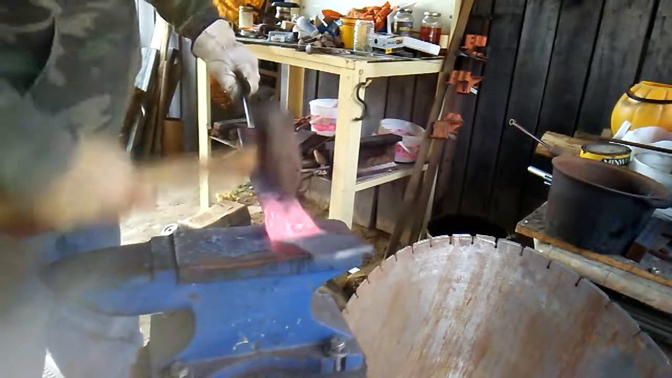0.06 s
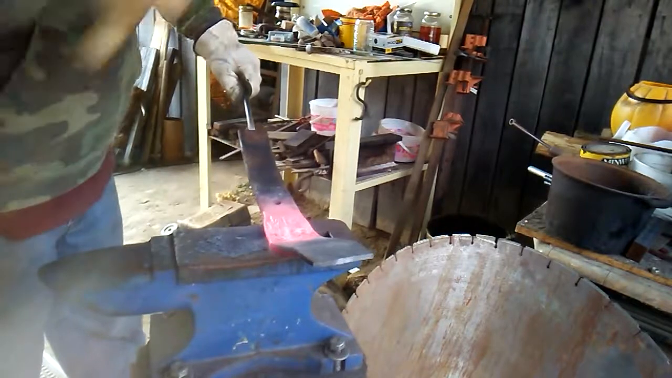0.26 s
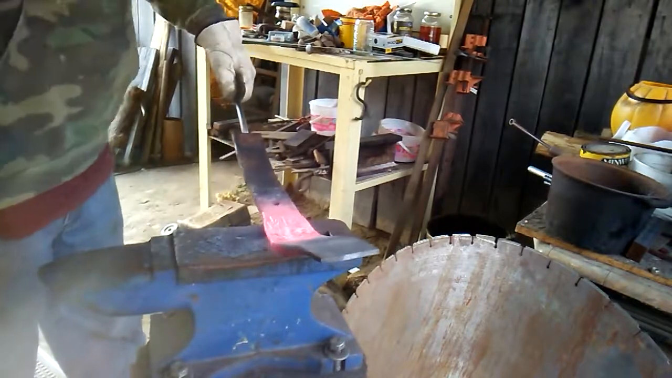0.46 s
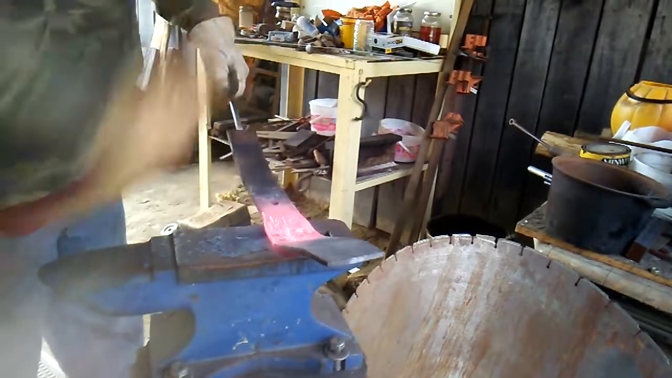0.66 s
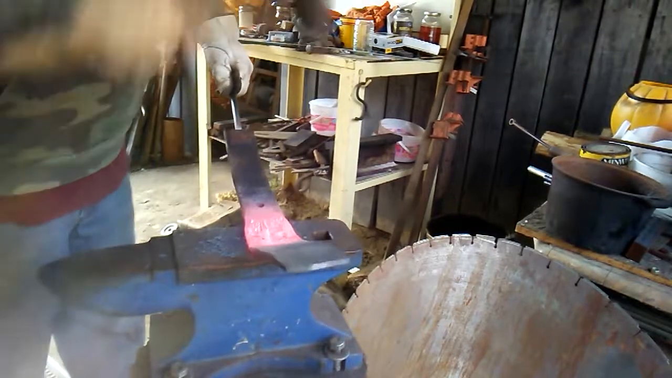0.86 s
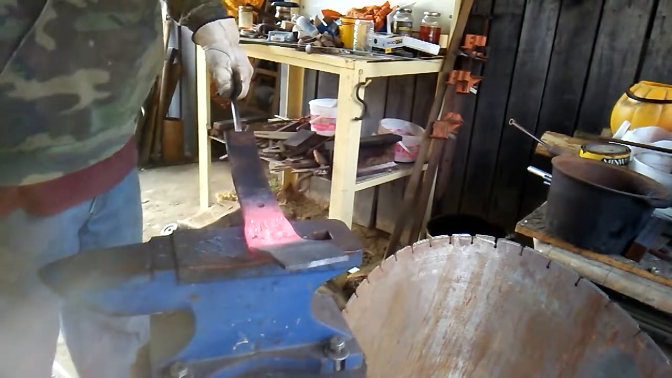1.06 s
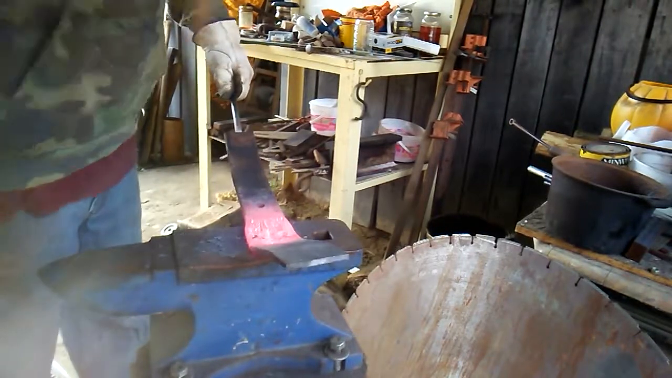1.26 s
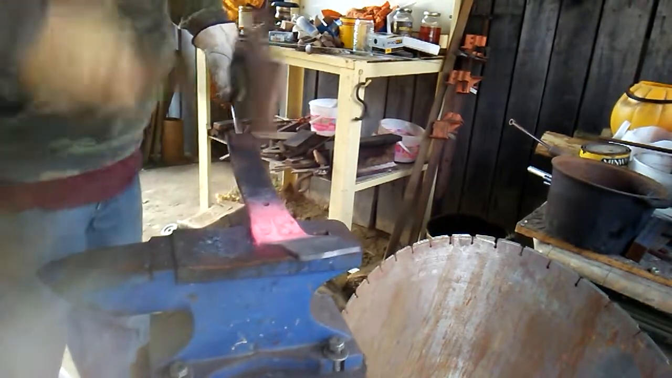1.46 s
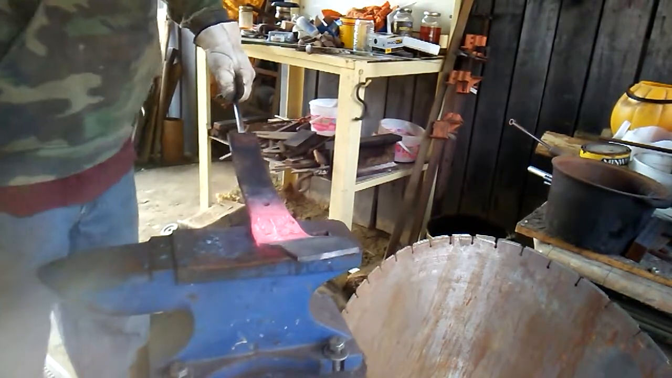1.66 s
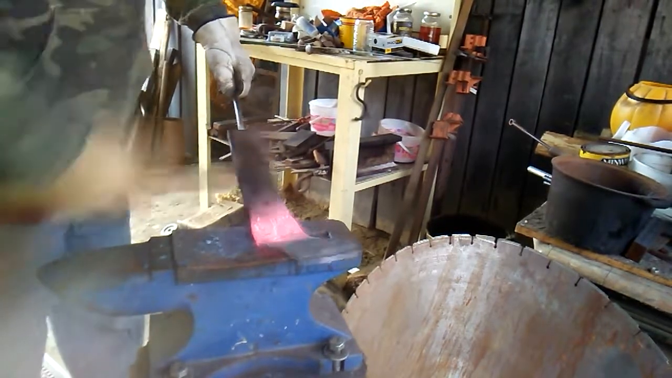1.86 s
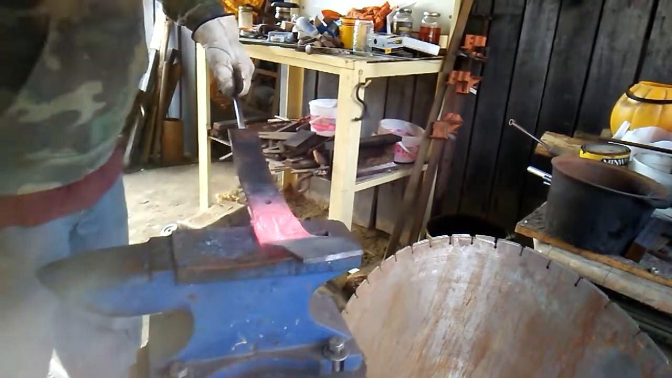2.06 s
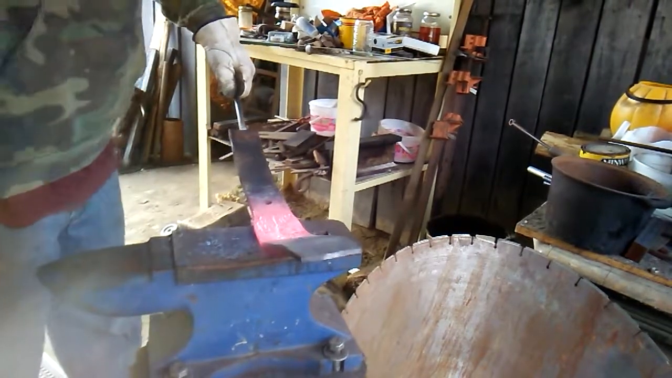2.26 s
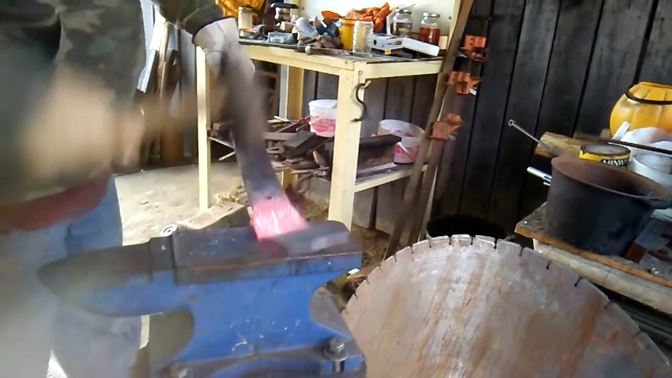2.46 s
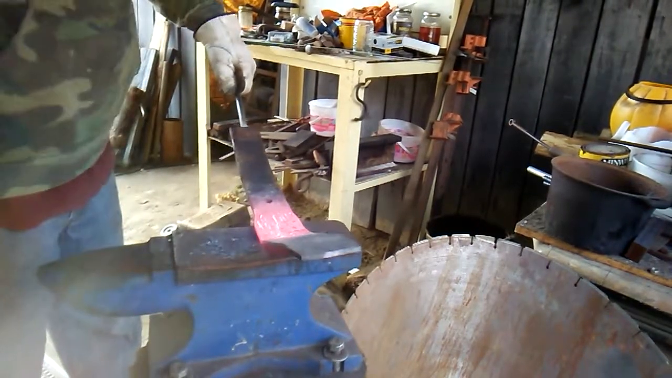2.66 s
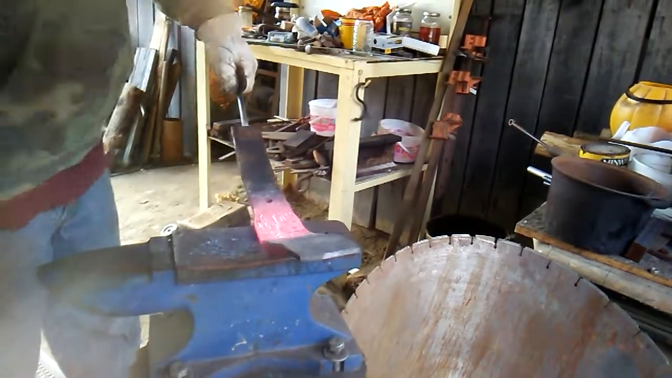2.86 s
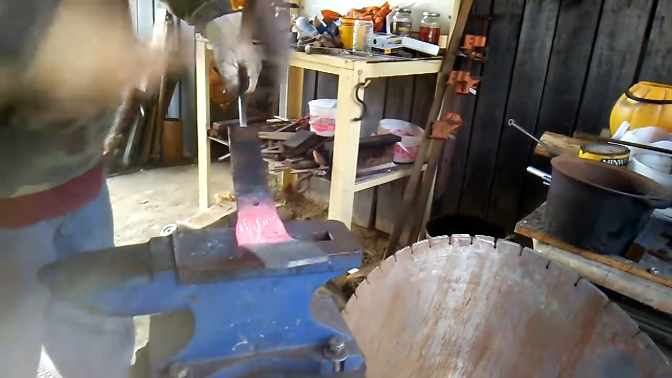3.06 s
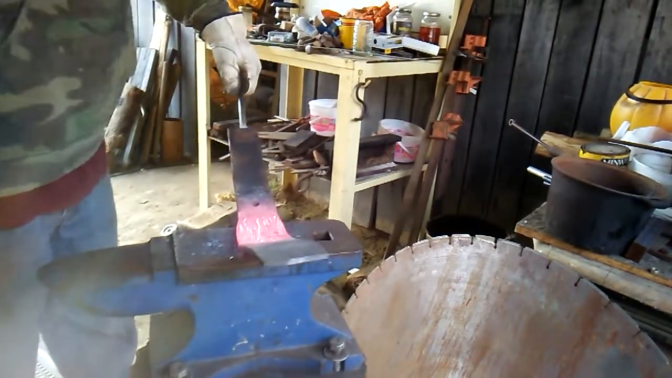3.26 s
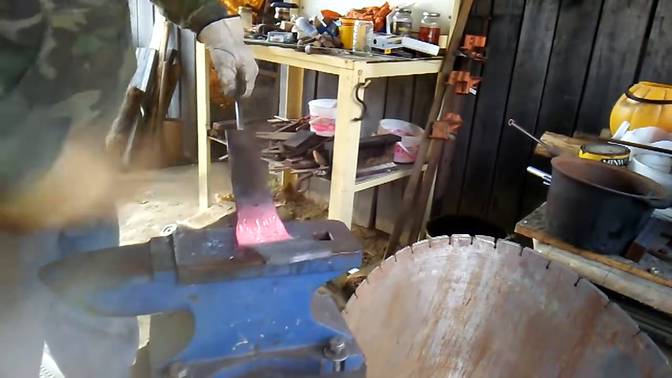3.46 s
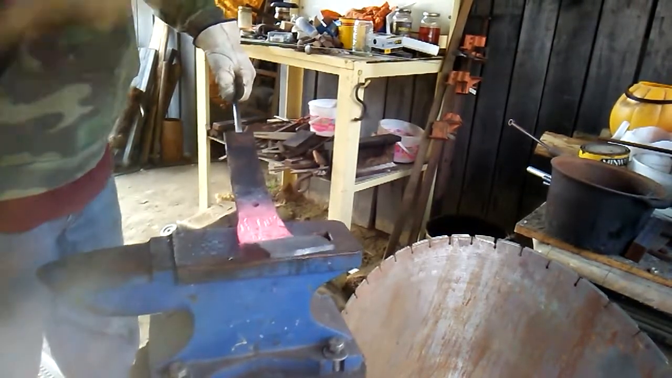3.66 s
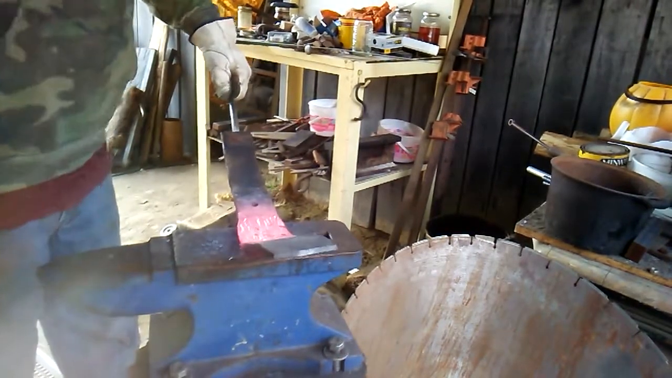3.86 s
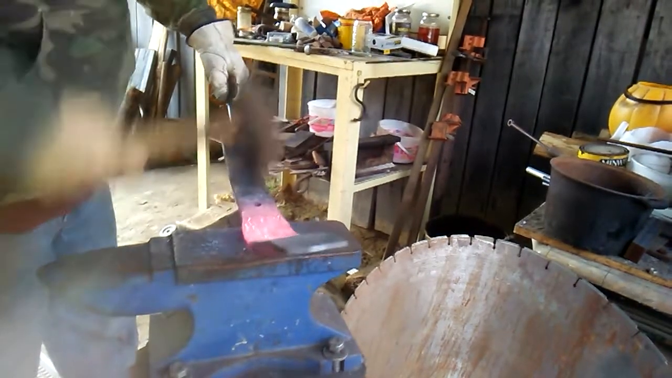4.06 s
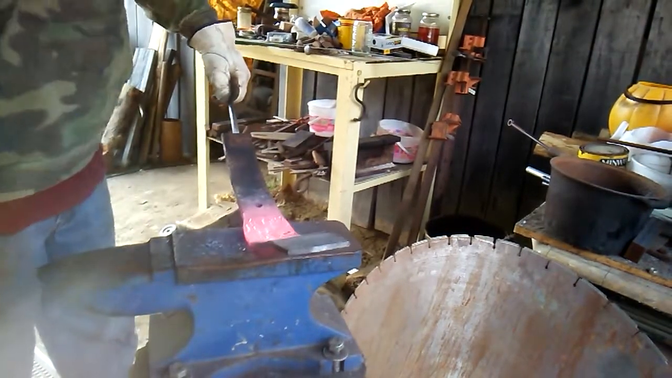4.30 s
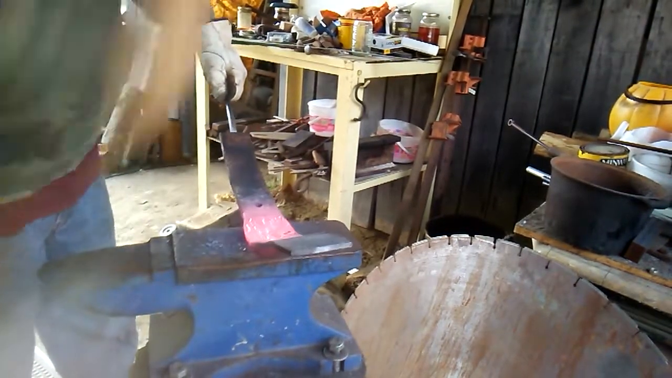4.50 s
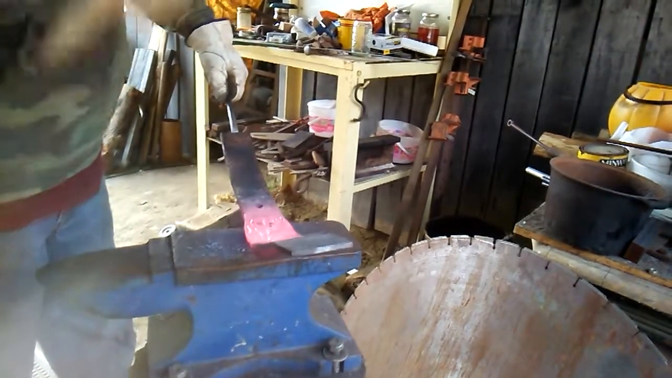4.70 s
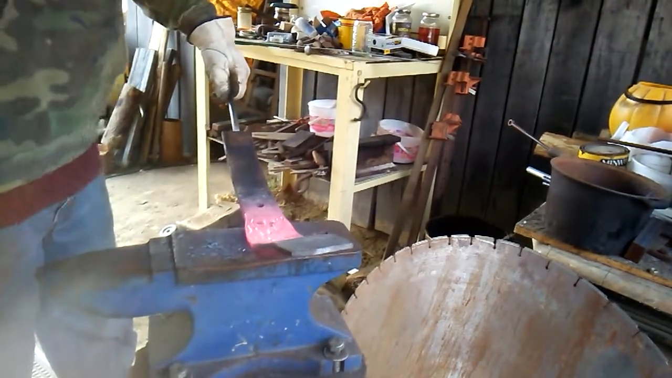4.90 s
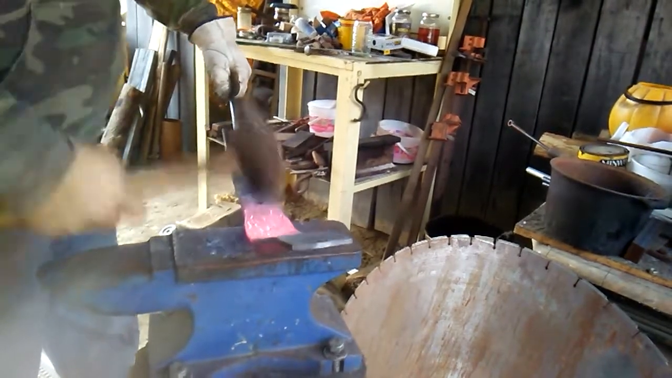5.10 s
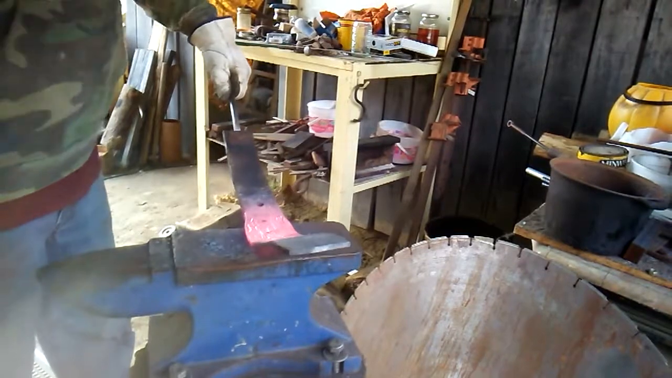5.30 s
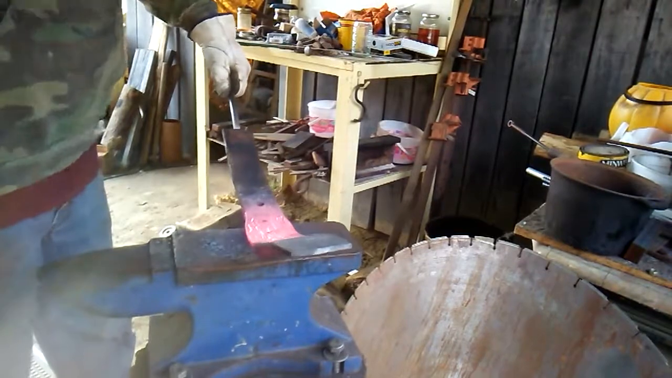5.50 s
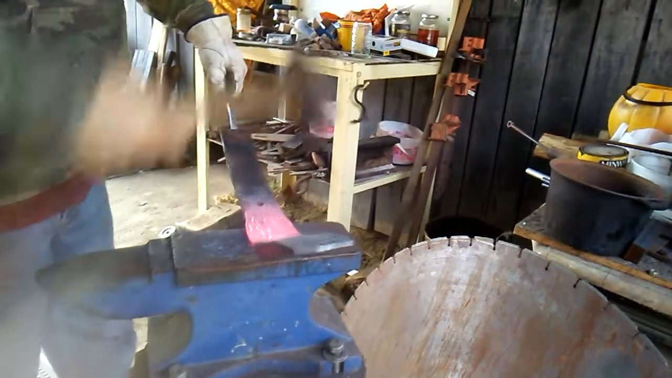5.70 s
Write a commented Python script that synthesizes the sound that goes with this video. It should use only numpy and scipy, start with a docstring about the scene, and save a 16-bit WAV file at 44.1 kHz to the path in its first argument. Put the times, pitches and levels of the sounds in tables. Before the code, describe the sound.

Steady, sharp hammer blows clang on a steel bar and anvil in a small workshop while a motor hums softly.

```python
"""A smith flattens a red-hot steel bar on an anvil in a small wooden shop.
From the start a motor, likely the forge blower, hums in a slow, even throb over a soft hiss.
Ten hammer blows follow, each a crack, a crash with short clanging modes, then a thin high ring;
they overload the microphone. The bar slides before the second blow and bounces after it,
then slides again before the third and eighth. From the third on, the beat is even."""
import sys
import numpy as np
from scipy import signal
from scipy.fft import rfft, irfft
from scipy.io import wavfile
from scipy.ndimage import uniform_filter1d

SR = 44100
rng = np.random.default_rng(int(sys.argv[2]) if len(sys.argv) > 2 else 0)


def waveform_to_disk(signal):
    """Save audio, clipped to [-1, 1], as 16-bit WAV at the path in sys.argv[1]."""
    frames = np.transpose(np.atleast_2d(signal))
    scaled = np.clip(frames, -1, 1) * 32767
    samples = np.round(scaled).astype(np.int16)
    wavfile.write(sys.argv[1], SR, samples)


N = 253134

# start_s, force_db, thud_db, bright_db, clang_hz, clang_db, ring_db, ring_t60_s, ping_db
BLOWS = [(0.149, -2.5, 3, -1.5, 5543, -10, 8, 0.35, 0.5),
         (0.8250, -3.5, 2.5, 1.5, 1843, -12, -1.5, 0.42, -8),
         (1.4655, 1.5, -1.5, 5.5, 6750, -5, -4, 0.34, 3), (1.9949, 2, -0.5, 1, 3568, -13, -0.5, 0.22, -2),
         (2.5155, 3.5, -2, -4, 4530, -13, -5, 0.33, 9), (3.0621, 1.5, 0, -2, 2471, -17.5, 6, 0.3, -1),
         (3.5969, 3.5, -4.5, -5, 4340, -18, 1.5, 0.26, -1), (4.1330, 4, -4, 2, 7080, -7, -4.5, 0.44, 3),
         (4.6710, 4.5, -3, 1, 4526, -14, -8.5, 0.32, -0.5),
         (5.1972, 4.5, -3, 3.5, 6420, -22.5, -2.5, 0.26, 0)]


def hammer(t, walls, gain_db=11, crack_db=-4, crack_decay_s=0.0073, ping_hz=8800):
    """Steel strikes steel: a contact crack, a crash and ringing modes."""
    out = np.zeros(N)
    for start_s, force_db, thud_db, bright_db, clang_hz, clang_db, ring_db, ring_t60_s, ping_db in BLOWS:
        blow = amp(crack_db) * np.exp(-t / crack_decay_s) * rng.standard_normal(len(t))
        blow += crash(unit(walls + rng.standard_normal(len(t))), thud_db, bright_db)
        blow += clang(t, thud_db, bright_db, clang_hz, clang_db)
        blow += anvil_ring(t)
        blow += high_ring(t, ring_db, ring_t60_s)
        ping = ring([(ping_hz, ping_db - 32)], t, t60_s=0.35, scatter=1.0, scatter_hz=30.2)
        add(out, start_s, amp(gain_db + force_db) * (blow + ping))
    return out


# freq_hz, density_db
CRASH_SPECTRUM = [(30, -21), (120, -20), (190, -8), (300, -0.5), (450, -8.5), (900, -2.5), (1620, -3.5),
                  (2450, -0.5), (3000, -4), (4300, 1.5), (4950, -2.5), (7000, 1), (9200, -3.5),
                  (12000, -18), (16000, -45)]
# freq_hz, t60_s
CRASH_DECAY = [(100, 0.24), (400, 0.25), (1500, 0.18), (4000, 0.19), (8000, 0.17), (14000, 0.15)]
# freq_hz, relative_db
SHOP_ECHO = [(200, -28), (1500, -27), (3600, -28.5), (4900, -48.5), (7500, -35), (14000, -44.5)]


def crash(noise, thud_db, bright_db, echo_t60_s=0.63):
    """Countless short modes and wall reflections merge into noise that dies band by band."""
    hz, time_s, bands = signal.stft(noise, SR, nperseg=512, noverlap=384)
    hz = hz[:, None]
    # each landing spot favours other modes
    spot_db = 1.8 * unit(uniform_filter1d(rng.standard_normal(hz.shape), 2, axis=0))
    colour = unit(amp(curve(CRASH_SPECTRUM, hz))) * amp(tilt_db(hz, thud_db, bright_db) + spot_db)
    early = amp(-60 * time_s / curve(CRASH_DECAY, hz))
    echo = amp(curve(SHOP_ECHO, hz) - 60 * time_s / echo_t60_s)
    shaped = bands * colour * np.hypot(early, echo)
    return signal.istft(shaped, SR, nperseg=512, noverlap=384)[1][:len(noise)]


# pitch_hz, level_db
STEEL_MODES = [(298, -20), (322, -22), (596, -22), (634, -22), (800, -24), (896, -22), (1000, -22.5),
               (1407, -23), (1843, -15), (1915, -18), (1968, -16), (2461, -19), (2545, -23), (2860, -24),
               (3255, -23), (3568, -17.5), (3780, -20), (4310, -20), (4440, -20), (4526, -17), (5543, -18),
               (5617, -21), (6514, -19), (6748, -17), (6962, -19), (7086, -20)]
# freq_hz, t60_s
STEEL_DECAY = [(300, 0.25), (900, .2), (1900, 0.22), (3600, 0.2), (4600, 0.16), (7000, 0.14)]


def clang(t, thud_db, bright_db, clang_hz, clang_db, modes_gain_db=-3.5, clang_gain_db=2):
    """Modes of hammer, bar and anvil; the landing spot makes one stand out."""
    mode_hz, mode_db = np.transpose(STEEL_MODES)
    struck_db = mode_db + modes_gain_db + tilt_db(mode_hz, thud_db, bright_db)
    struck_db[np.argmin(abs(mode_hz - clang_hz))] = clang_gain_db + clang_db
    modes = list(zip(mode_hz, struck_db))
    return ring(modes, t, curve(STEEL_DECAY, mode_hz), scatter=1.1, scatter_hz=25)


# pitch_hz, level_db
HIGH_MODES = [(10675, -30), (10866, -18), (10968, -14), (12790, -42)]


def high_ring(t, ring_db, t60_s, gain_db=-11.5):
    """Thin, long-ringing modes of the steel."""
    return amp(gain_db + ring_db) * ring(HIGH_MODES, t, t60_s, scatter=0.6, scatter_hz=24)


# pitch_hz, level_db
ANVIL_MODES = [(1968, -4), (2461, -1), (3568, 0), (5543, -13), (6514, -8)]


def anvil_ring(t, gain_db=-43):
    """The anvil body rings on faintly after the clang."""
    return amp(gain_db) * ring(ANVIL_MODES, t, t60_s=0.54, scatter=1.3, scatter_hz=50)


# start_s, level_db
BAR_BOUNCES = [(0.921, -21)]


def bar_bounce(t, walls, decay_s=0.017):
    """The bar drops back on the anvil with a short crash."""
    out = np.zeros(N)
    for start_s, level_db in BAR_BOUNCES:
        add(out, start_s, amp(level_db) * crash(walls, thud_db=0, bright_db=0) * np.exp(-t / decay_s))
    return out


# start_s, level_db, decay_s
BAR_SLIDES = [(0.68, -56, 0.4), (1.321, -66, .2), (4.104, -41.5, 0.064)]


def bar_slides(band_hz=(6300, 9500)):
    """Scale on the bar scratches the anvil face with a thin hiss."""
    out, t = np.zeros(N), np.arange(SR // 2) / SR
    band = signal.butter(4, band_hz, "bandpass", fs=SR, output="sos")
    for start_s, level_db, decay_s in BAR_SLIDES:
        hiss = unit(signal.sosfilt(band, rng.standard_normal(len(t))))
        add(out, start_s, amp(level_db) * np.exp(-t / decay_s) * hiss)
    return out


CYCLE_S, CYCLE_START_S = 0.896, 0.25
# shaft_multiple, level_db
MOTOR_ORDERS = [(3, -60.5), (5, -51.5), (7, -46), (9, -47), (10, -52.5), (11, -49), (12, -50.5),
                (15, -50.5), (16, -45.5), (19, -61), (20, -49)]


def motor(t, shaft_hz=30.17, hum_hz=239.3, hum_db=-32, drop_db=-16, sag_db=-4.5):
    """Wavering shaft orders and a strong hum that drops out at each cycle's start and sags halfway."""
    orders = np.zeros(N, complex)
    for multiple, level_db in MOTOR_ORDERS:
        tone = np.exp(2j * np.pi * (multiple * shaft_hz * t + rng.random()))
        orders += amp(level_db) * tone * (1 + 0.34 * waver(N, rate_hz=1.6))
    throb_db = drop_db * swell(t, peak_s=0, width_s=0.066)
    throb_db += sag_db * swell(t, peak_s=CYCLE_S / 2, width_s=0.1)
    hum = amp(hum_db + throb_db) * np.exp(2j * np.pi * hum_hz * t) * (1 + 0.3 * waver(N, rate_hz=3))
    return np.sqrt(2) * (orders + hum).real


# freq_hz, density_db
BACKGROUND_HISS_SPECTRUM = [(25, -35), (75, 1), (125, -31), (155, -4), (250, 4), (400, -3), (600, 0.5),
                            (900, -7.5), (1800, -15), (4000, -19.5), (4450, -51), (5200, -51.5),
                            (7300, -30), (11000, -40), (16000, -41)]


def background_hiss(t, level_db=-38, swell_db=1.5):
    """A soft background hiss, dulled above 4 kHz, swells once a cycle."""
    colour = amp(curve(BACKGROUND_HISS_SPECTRUM, np.fft.rfftfreq(N, 1 / SR)))
    hiss = unit(irfft(rfft(rng.standard_normal(N)) * colour, N))
    return hiss * amp(level_db + swell_db * swell(t, peak_s=0.31, width_s=0.22))


def whine(t, pitch_hz=1640, level_db=-65, swell_db=15.5):
    """A faint, fuzzy motor resonance swells just after the hiss."""
    tone = unit((waver(N, rate_hz=60) * np.exp(2j * np.pi * pitch_hz * t)).real)
    return tone * amp(level_db + swell_db * swell(t, peak_s=0.43, width_s=0.28))


def ring(modes, t, t60_s, scatter, scatter_hz):
    """Decaying modes, one t60 for all or one each; reflections scatter level and phase."""
    out = np.zeros(len(t))
    for (pitch_hz, level_db), life_s in zip(modes, t60_s * np.ones(len(modes))):
        tone = np.exp(2j * np.pi * (pitch_hz * t + rng.random()))
        tone *= 1 + scatter * waver(len(t), scatter_hz)
        out += amp(level_db - 60 * t / life_s) * tone.real
    return out


def tilt_db(hz, thud_db, bright_db):
    """A soft landing adds thud, a hard one brightness."""
    return thud_db / (1 + (hz / 1400) ** 2) + bright_db * hz ** 4 / (hz ** 4 + 6000 ** 4)


def swell(t, peak_s, width_s):
    """Gaussian bump, 0 to 1, peak_s into every motor cycle."""
    away_s = (t - CYCLE_START_S - peak_s + CYCLE_S / 2) % CYCLE_S - CYCLE_S / 2
    return np.exp(-(away_s / width_s) ** 2)


def waver(size, rate_hz):
    """Complex noise, rms 1, low-passed at rate_hz."""
    knots = np.arange(0, size + 64, 64)
    hz = np.fft.fftfreq(len(knots), knots[1] / SR)
    spectrum = rng.standard_normal(len(knots)) + 1j * rng.standard_normal(len(knots))
    drift = unit(np.fft.ifft(spectrum / (1 + (hz / rate_hz) ** 4)))
    return np.interp(np.arange(size), knots, drift)


def curve(points, hz):
    """Table lookup on a log-frequency axis."""
    point_hz, value = np.transpose(points)
    return np.interp(np.log(hz + 1), np.log(point_hz + 1), value)


def amp(db):
    return 10 ** (np.asarray(db) / 20)


def unit(x):
    """Scales to rms 1."""
    return x / np.sqrt(np.mean(abs(x) ** 2) + 1e-20)


def add(mix, start_s, sound):
    part = mix[round(start_s * SR):][:len(sound)]
    part += sound[:len(part)]


def scene():
    """Anvil work over the blower, mono."""
    t, blow_t = np.arange(N) / SR, np.arange(0, 0.56, 1 / SR)
    walls = rng.standard_normal(len(blow_t))  # anvil and walls stay put, so half of each crash repeats
    forging = hammer(blow_t, walls) + bar_bounce(blow_t, walls) + bar_slides()
    return (forging + motor(t) + background_hiss(t) + whine(t))[None]


def gain_control(x, threshold_db=-8, slope=0.81, attack_s=0.00051, release_db_per_s=400):
    """Turns each blow down at once and recovers fast."""
    pole = np.exp(-1 / (attack_s * SR))
    power_db = 10 * np.log10(signal.lfilter([1 - pole], [1, -pole], x ** 2) + 1e-12)
    release_db = release_db_per_s * np.arange(N) / SR
    held_db = np.maximum.accumulate(power_db + release_db) - release_db
    return x * amp(-slope * np.maximum(held_db - threshold_db, 0))


def record(dry, overload_db=9, low_cut_hz=110, ceiling=0.95, high_cut_hz=15800):
    """Microphone overload, low cut, gain control, hard ceiling, band limit."""
    x = dry[0] / (1 + (dry[0] / amp(overload_db)) ** 8) ** (1 / 8)
    x = signal.sosfilt(signal.butter(1, low_cut_hz, "highpass", fs=SR, output="sos"), x)
    x = np.clip(gain_control(x), -ceiling, ceiling)
    lowpass = signal.firwin(511, high_cut_hz, window=("kaiser", 8), fs=SR)
    return signal.oaconvolve(x, lowpass, "same")[None]


dry = scene()
out = record(dry)
waveform_to_disk(out)
```